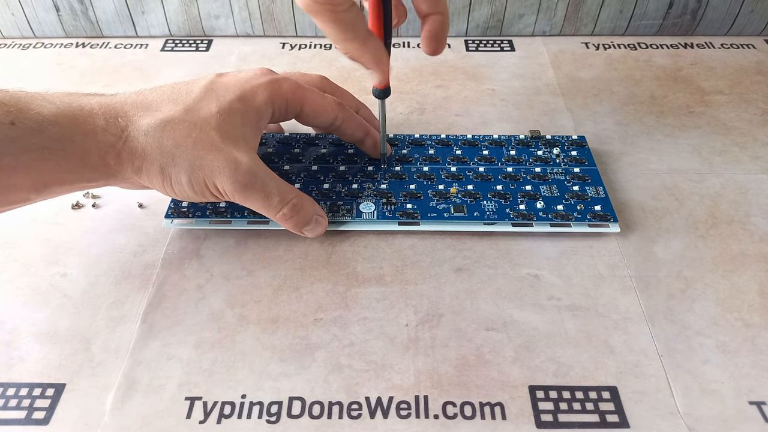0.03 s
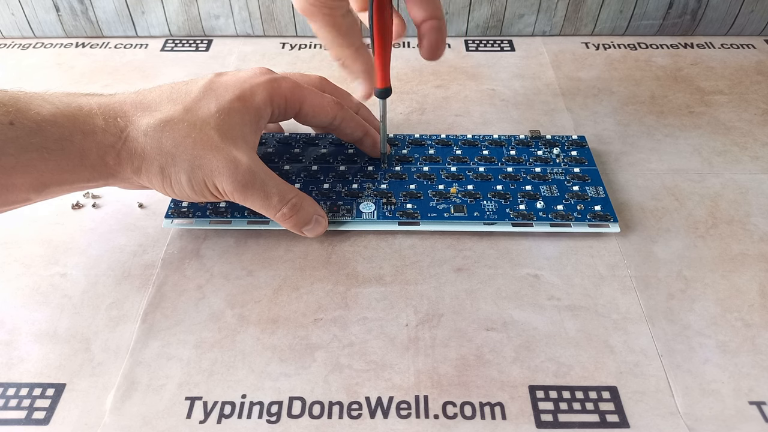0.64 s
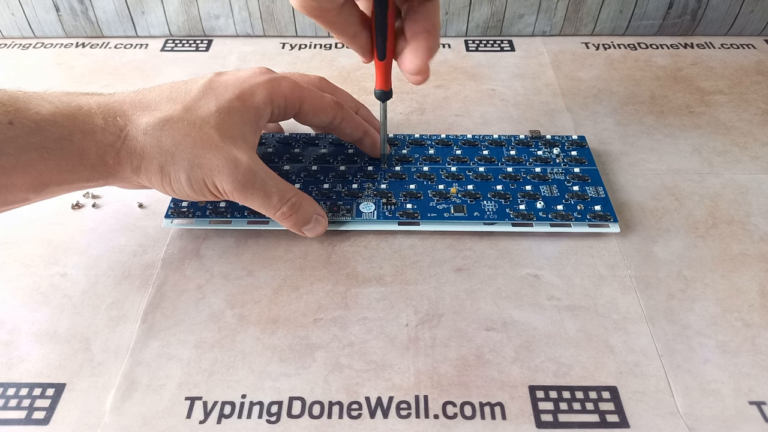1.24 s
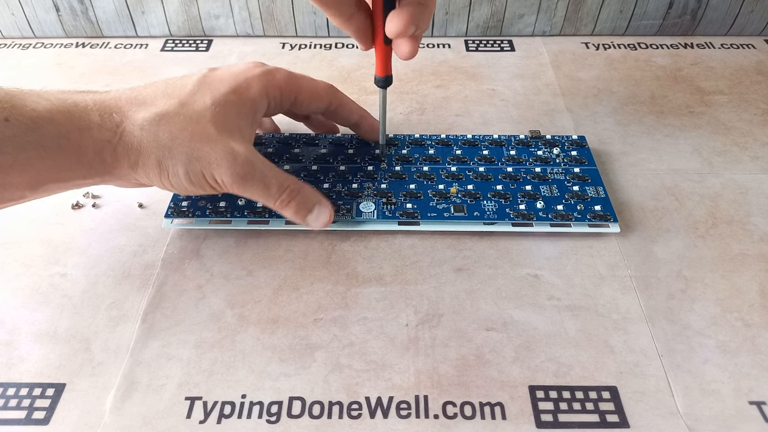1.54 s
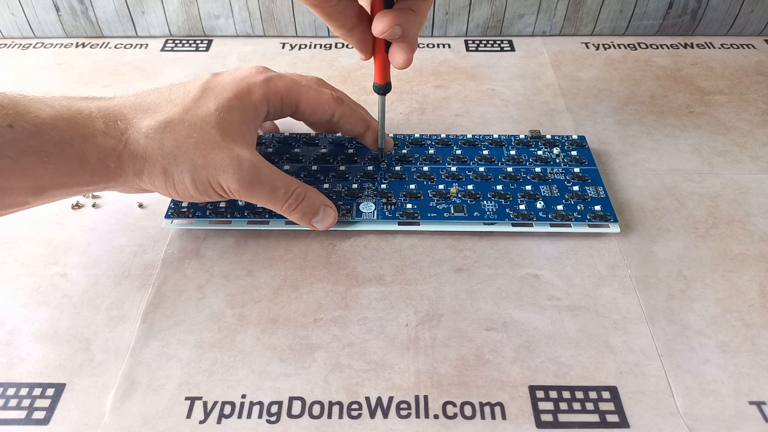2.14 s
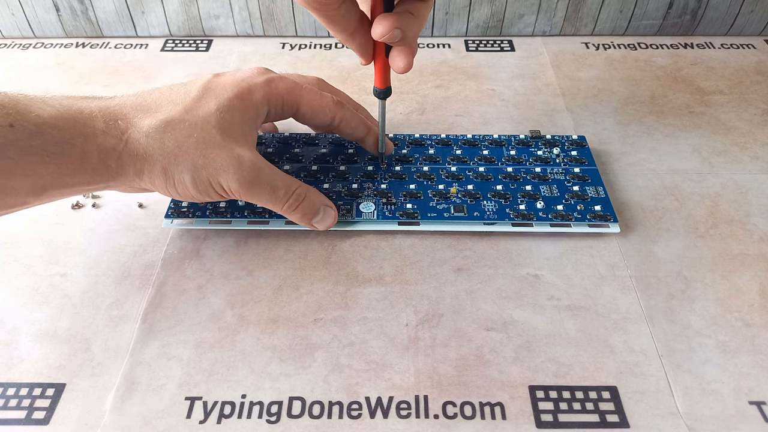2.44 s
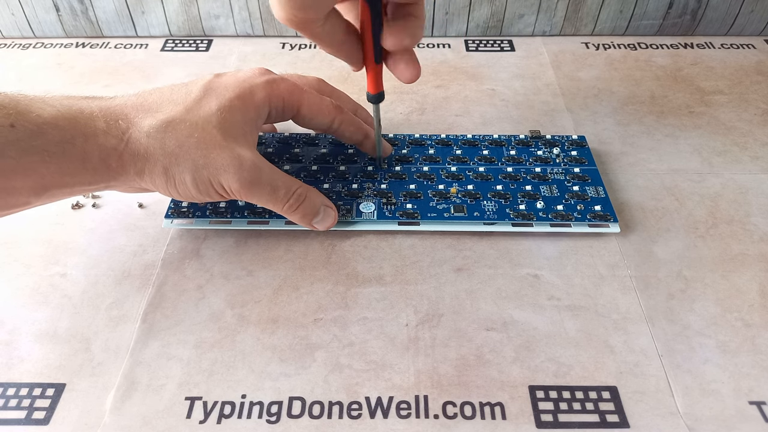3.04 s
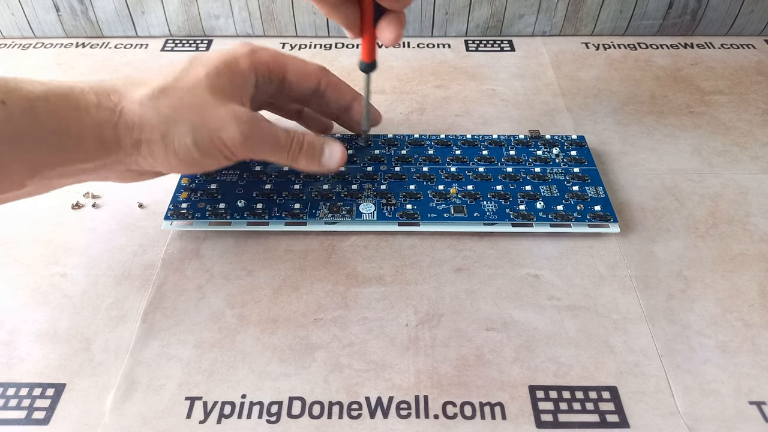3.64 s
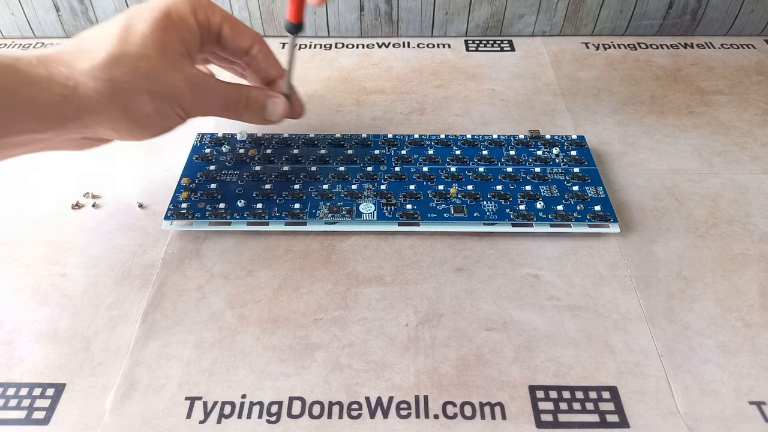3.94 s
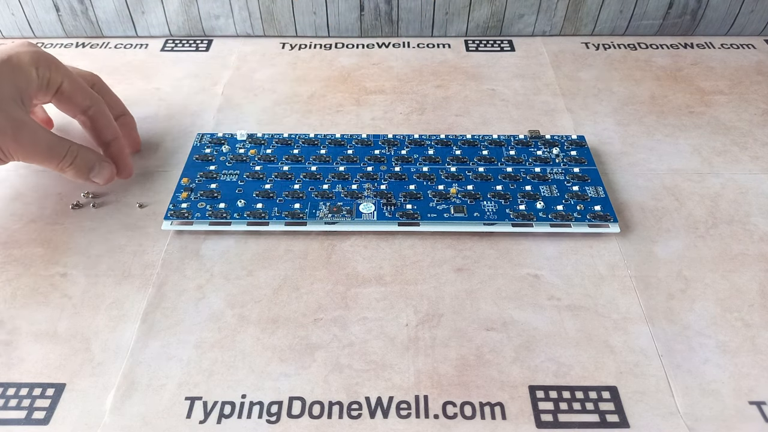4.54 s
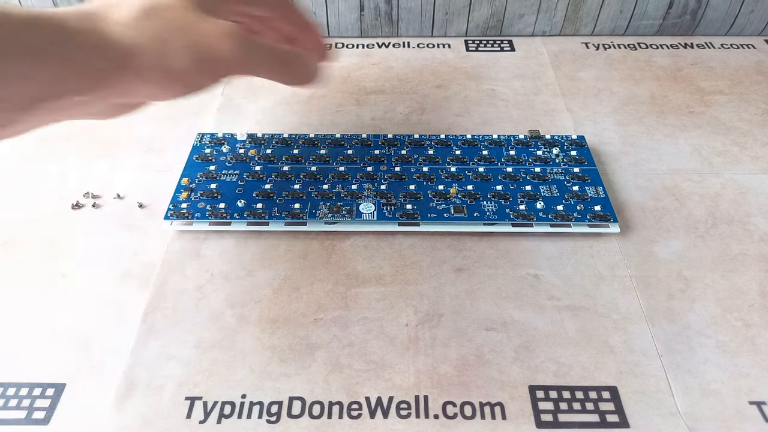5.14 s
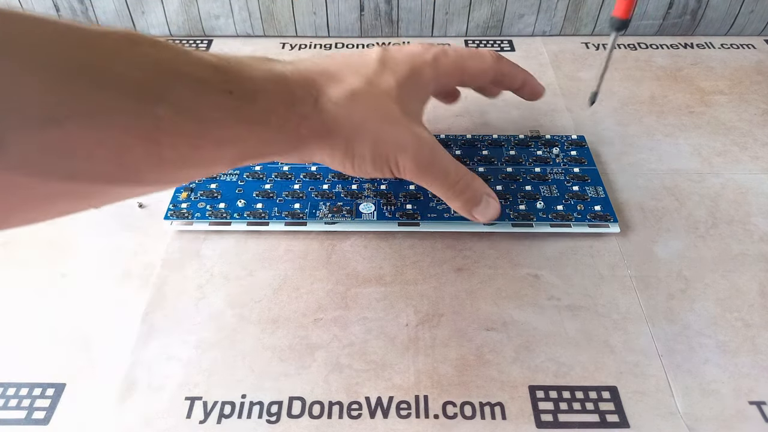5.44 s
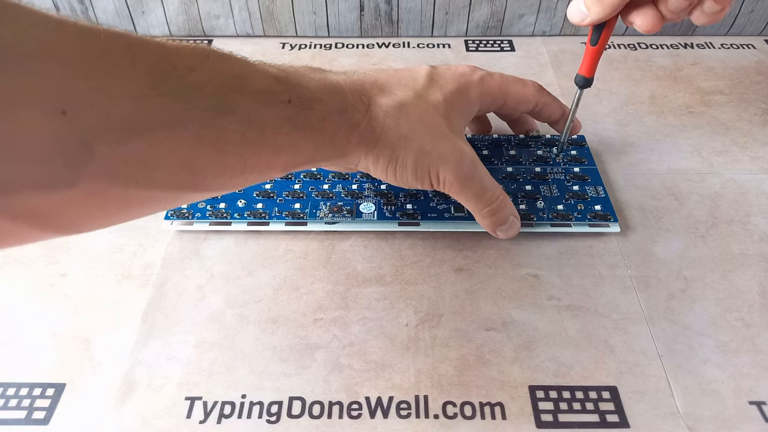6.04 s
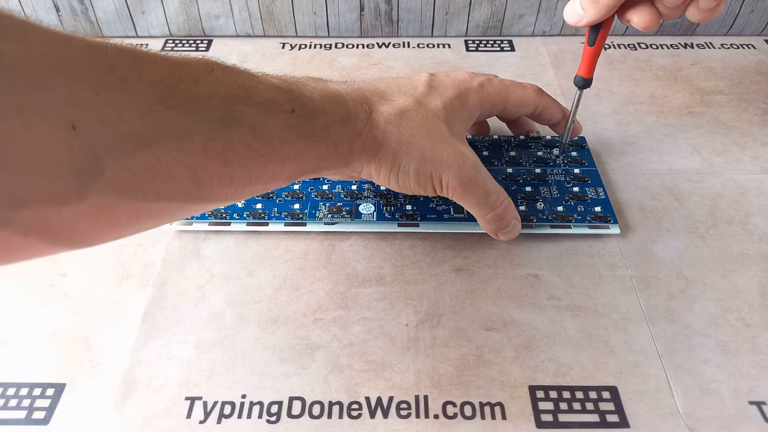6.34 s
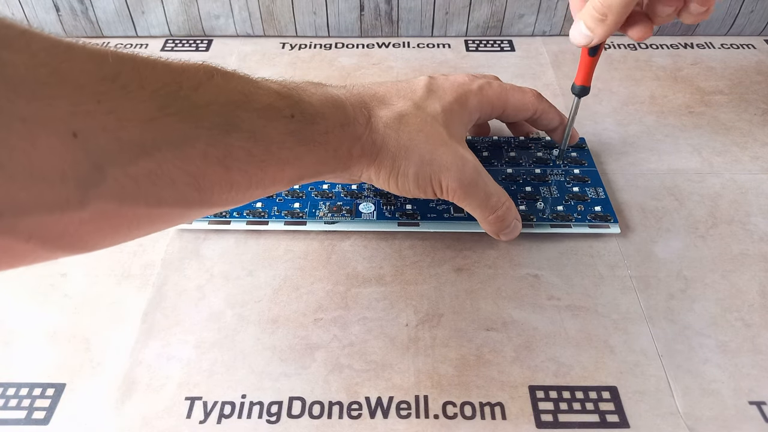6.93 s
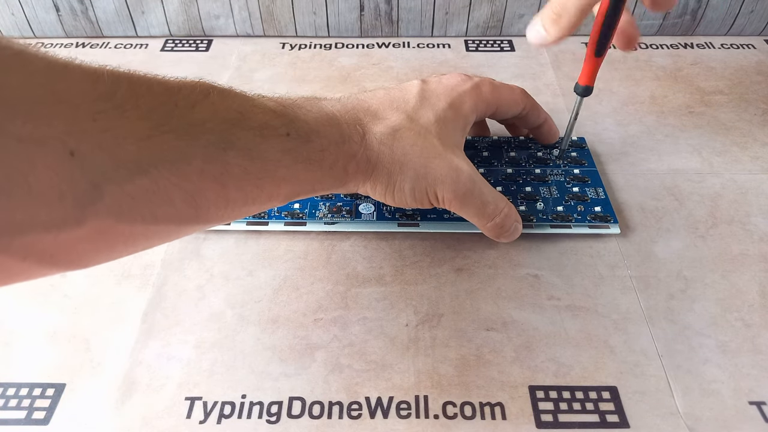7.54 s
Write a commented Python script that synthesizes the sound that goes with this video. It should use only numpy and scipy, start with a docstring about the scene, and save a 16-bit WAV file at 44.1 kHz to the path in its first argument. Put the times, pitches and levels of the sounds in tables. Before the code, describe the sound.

Steel grinds and snaps in a screw head, knocking a keyboard's board, with pauses and one tiny screw clattering onto a table.

```python
"""A steel tip grinds and snaps in a screw head: a hand screwdriver is backing small screws out of a
keyboard's circuit board. The tip catches, grinds round and slips, ringing the shaft and jolting the
board, first at its middle, later at a corner. In between, the freed screw drops and bounces on the table.
A stereo microphone hears it from close by in a small room, with faint squeaks of the thread, pings of
brushed parts, bumps and rubs of the hands, and a low room tone behind."""
import sys
import numpy as np
from scipy import signal
from scipy.fft import rfft, irfft, next_fast_len
from scipy.io import wavfile
from scipy.ndimage import uniform_filter1d, map_coordinates

SR = 44100
rng = np.random.default_rng(int(sys.argv[2]) if len(sys.argv) > 2 else 0)


def inscribe(sig):
    """Save sig as 16-bit PCM at rate SR to the path in sys.argv[1].

    A 1-D sig is mono; a 2-D sig holds one channel per row.
    Samples are clipped to [-1, 1] before scaling.
    """
    pcm = np.round(np.clip(np.atleast_2d(sig).T, -1, 1) * 32767)
    wavfile.write(sys.argv[1], SR, pcm.astype(np.int16))


N = 343980
SIZE = 2 ** 15  # samples in one event's buffer
T = np.arange(SIZE) / SR
HZ = np.fft.rfftfreq(SIZE, 1 / SR)
CORNER_S = 5.4  # the work moves to the corner of the board
NEUTRAL_DB, CATCH_SHARP_DB = -23, -6.5  # level of a middling contact; sharpness of every catch

# Under the hand's weight the tip slips, snaps against the screw and jolts the board:
# (time [s], tip level [dB], board level [dB], sharpness [dB]). All table levels are relative.
SLIPS = [(0.1288, -11.5, -32.5, -14), (.3655, -36, -38.5, -8), (0.423, -29.5, -33.5, -10.5),
         (.700, -17.5, -23.5, -2.5), (.717, -20, -21, -9.5), (1.052, -26, -38.5, -22.5),
         (1.1226, -17, -25.5, -31), (1.471, -40.5, -42.5, -12), (1.608, -38.5, -41, -8),
         (2.625, -32, -34, -11), (2.9373, -11, -13.5, -1), (3.182, -30.5, -35.5, 2),
         (3.232, -30, -48.5, 17.5), (3.742, -47, -49.5, -3), (6.721, -35, -31, -11),
         (6.981, -34, -28.5, -12.5), (7.408, -47, -31, -8.5), (7.588, -48.5, -47, -30)]
# The tip drops into the cross before the hand bears down: (time [s], tip level [dB], board level [dB])
CATCHES = [(.346, -52, -48.5), (.662, -33, -37), (1.008, -30, -32.5), (1.388, -53, -38),
           (2.599, -36.5, -48.5), (3.163, -33, -38)]
# The tip grinds round and drags the board along:
# (time of hardest pressure [s], rise time [s], tip level [dB], board level [dB], sharpness [dB])
GRINDS = [(.098, .006, -42, -71, -8.5), (.129, .010, -27.5, -52.5, -8), (.415, 0.011, -23, -39.5, -3.5),
          (.702, .014, -26.5, -30, -4.5), (1.050, 0.017, -35.5, -47.5, -12.5),
          (1.082, .010, -40.5, -32, -9), (1.121, .005, -40.5, -35, -17), (1.489, .006, -36.5, -43.5, 10.5),
          (2.87, .031, -53.5, -56.5, -18.5), (2.935, 0.0099, -28.5, -24, 1),
          (3.194, .009, -35, -45.5, 12.5), (3.238, .012, -44.5, -58, 15.5), (3.725, 0.02, -72, -56.5, -15),
          (6.706, 0.011, -50, -46.5, 9.5), (7.498, .012, -44.5, -42.5, -1),
          (7.590, .014, -58.5, -53.5, -11)]
# Spectrum of sliding skin: (frequency [Hz], level [dB])
SKIN = [(300, -16.5), (1000, -19), (2000, 3), (3800, 0.5), (6500, -1.5), (10000, -17)]


def snaps(level_db=-4, t60=0.009):
    """The tip hits the wall of the screw's cross: hard hits are abrupt, light ones skid for a moment."""
    # The loose tip ticks and leaves the board still: (time [s], level [dB], sharpness [dB])
    ticks = [(.057, -52, -6), (2.583, -35, 12), (3.2005, -25, 23), (3.615, -52, -1), (3.902, -55, 20.5),
             (7.121, -46, 2.5), (7.172, -54, -8.5)]
    blows = [(s, db, sharp_db) for s, db, _, sharp_db in SLIPS]
    blows += [(s, db, CATCH_SHARP_DB) for s, db, _ in CATCHES]
    out = np.zeros((2, N))
    for s, db, sharp_db in blows + list(ticks):
        contact_s = np.interp(db, [-30, -15], [.022, .004])
        grip = (1 - fade(contact_s)) ** 2
        life = t60 + contact_s / 3
        force = radiate([burst(life) * grip, burst(life) * grip], unlike=.55)
        snap = in_room(shaft(force, s, db, sharp_db), wet_db=0, near_db=-3)
        below_fizz = irfft(rfft(snap) * (HZ < SR / 6))
        add(out, s - contact_s / 20, amp(db + level_db) * snap / rms(below_fizz[:, :SR // 250]))
    return out


def scrapes(level_db=-1, slips_per_s=1500, scatter_db=5):
    """Steel grinds on steel in tiny uneven slips, which grow with the pressure and then let go."""
    out = np.zeros((2, N))
    for s, rise, db, _, sharp_db in GRINDS:
        lead, fall = min(s, 5 * rise), 0.98 * rise
        pressure = np.exp(np.minimum((T - lead) / rise, (lead - T) / fall))
        slipping = rng.random(SIZE) < slips_per_s / SR
        slips = slipping * amp(scatter_db * rng.uniform(-1.2, 1, SIZE)) * rng.choice([-1, 1], SIZE)
        force = pressure * (slips / rms(slips) + 0.37 * rng.standard_normal(SIZE))
        force *= rms(pressure) / rms(force)
        scrape = in_room(shaft(force, s, db, sharp_db), wet_db=2.5, near_db=-0.5)
        add(out, s - lead, amp(db + level_db) * scrape)
    return out


def shaft(force, s, db, sharp_db):
    """Contact rings the shaft: brighter when light or sharp, or with the tool tilted at the corner."""
    # Modes of the steel shaft: (frequency [Hz], width [Hz], level [dB])
    modes = [(2498, 83, -6), (3000, 350, -1), (3350, 550, 4.5), (3525, 25, 11.5), (4290, 990, 1.5),
             (4730, 900, -2), (6840, 420, -2.5)]
    bright_db = 0.16 * (NEUTRAL_DB - db) + 0.074 * sharp_db + 7.5 * (s > CORNER_S)
    edge = [(300, -4.5), (1200, 8), (2400, -bright_db / 3), (3500, 2), (4300, min(bright_db, 0)),
            (6500, bright_db), (7500, bright_db / 2), (10000, sharp_db - 1)]  # a sharp edge fizzes on top
    mode_power = sum(np.abs(resonances([mode])) ** 2 for mode in modes)
    body_db = 10 * np.log10(mode_power + amp(-15) ** 2)  # modes over a broad floor
    response = causal(along(edge, HZ) + body_db)
    return irfft(rfft(force) * response / rms(np.abs(response) * (HZ < SR / 6)))


def jolts(corner_life=0.66, rattle_db=4):
    """The board rocks on its case: slow low modes, a woody knock, a hard clack and rattling loose parts."""
    # Board modes: (frequency [Hz], t60 at the middle [s], level at the middle [dB], at the corner [dB])
    modes = [(126, 0.16, -16, -7), (165, 0.068, -3.5, -9.5), (197, 0.066, 0, -2), (258.6, 0.094, 2, 6.5),
             (280.4, 0.21, -1.5, -1.5), (314, 0.11, 1, -2.5), (415, 0.045, -5, -12.5),
             (470, 0.052, -10, -12.5), (522, 0.12, -1, -4.5), (601, 0.096, 0.5, -32),
             (656.4, .3, -5.5, -25), (693.3, 0.24, -6.5, -5), (741, .15, -3, -5), (804, 0.24, -10.5, -0.5),
             (844, 0.057, -8, -6), (1157, 0.062, -2.5, -2.5), (1330, 0.11, -13, 3.5),
             (1600, 0.24, -10.5, 2.5), (1919, 0.19, -10, -24), (2170, 0.07, -12, -27.5)]
    # Onset of the sub, thud, knock and clack registers: (rise time [s])
    rises = [.03, .012, 0.036, .008]
    hz, t60, middle_db, corner_db = np.transpose(modes)
    bands = ((4, 55, 130), (4, 130, 420), (3, 420, 1150), (2, 1150, 2600))
    registers = [signal.butter(order, (lo, hi), "bandpass", fs=SR, output="sos") for order, lo, hi in bands]
    out = np.zeros((2, N))
    for s, build_s, thud_db, knock_db, clack_db in board_blows():
        # the hands load the board anew at each jolt, shifting its modes; at the corner they damp it more
        pitch = hz * (1 + .02 * rng.standard_normal(len(hz)))
        mode_db, lives = (middle_db, t60) if s < CORNER_S else (corner_db, t60 * corner_life)
        rings = np.array([fade(life) * np.sin(2 * np.pi * f * T) for f, life in zip(pitch, lives)])
        strength = amp(mode_db + 2 * rng.standard_normal(len(hz))) * rng.choice([-1, 1], len(hz))
        rattle = 6 * amp(rattle_db) * radiate([burst(.05), burst(.05)], unlike=.5)
        board = in_room(strength @ rings + rattle, wet_db=1.5, near_db=-6) * (1 - fade(build_s)) ** 2
        levels_db = (thud_db - 15, thud_db + 0.5, knock_db - 2, clack_db - 2)
        for sos, rise, db in zip(registers, rises, levels_db):
            part = signal.sosfilt(sos, board * (1 - fade(rise)))
            add(out, s, amp(db) * part / rms(part[:, :SR // 16]), pan_db=-3)
    return out


def board_blows(lag_s=.0012, thud_limit_db=-22.5):
    """Slips, catches and grinds shake the board: weight gives thud, hard sharp contact gives clack."""
    def build_up_s(db):
        """Harder blows build up faster: the time halves for every 10 dB."""
        return .005 * 2 ** ((NEUTRAL_DB - db) / 10)

    # (time [s], build-up [s], level [dB], weight [dB], sharpness [dB])
    blows = [(s + lag_s, build_up_s(db), db, -5, sharp_db) for s, _, db, sharp_db in SLIPS]
    blows += [(s, build_up_s(db), db, -23, CATCH_SHARP_DB) for s, _, db in CATCHES]
    # in a grind the board starts to give before the hardest pressure
    blows += [(s - 1.4 * rise, 3 * rise, db, -6, sharp_db) for s, rise, _, db, sharp_db in GRINDS]
    for s, build_s, db, weight_db, sharp_db in blows:
        corner, hard_db = s > CORNER_S, db - NEUTRAL_DB
        thud_db = db + weight_db - 0.0984 * hard_db - 0.18 * sharp_db + 0.5 * corner
        clack_db = db - 6 + 0.08 * hard_db + .45 * min(sharp_db, 0) + 3.5 * corner
        yield s, build_s, min(thud_db, thud_limit_db), db, clack_db  # the case gives only so far


def dropped_screw(level_db=-6):
    """Each bounce is a sharp tick of the screw and a light knock of the table."""
    # The screw lands and bounces: (time [s], tick level [dB], knock level [dB])
    bounces = [(4.7133, -20.5, -51.5), (4.72, -39, -50), (4.7304, -27, -44.5), (4.778, -26, -46)]
    # Modes of the loose screw and of the table top: (frequency [Hz], width [Hz], level [dB])
    screw_modes = [(2900, 900, -13), (4850, 750, 0), (5400, 750, -1), (6500, 1200, -9), (12000, 8000, -23)]
    table_modes = [(260, 89, 6), (678, 67, 15), (1330, 230, -3)]
    tiny = causal(along([(1000, 12), (3400, -14), (4300, -4)], HZ))  # tone colour of the small screw
    knock = irfft(resonances(table_modes))
    out = np.zeros((2, N))
    for s, db, knock_db in bounces:
        impact = burst(.005) * (1 - fade(.002))
        tick = irfft(rfft(impact) * resonances(screw_modes) * tiny)
        blow = amp(db + level_db) * tick / rms(tick[:SR // 500])
        blow += amp(knock_db) * knock / rms(knock[:SR // 100])
        add(out, s, in_room(blow, wet_db=9.5, near_db=-2.5))
    return out


def squeaks(level_db=-15, db_per_rise_s=849.5, corner_db=3.5, scatter_db=3):
    """The thread sticks and slips and sings hoarsely: the slower a grind rises, the more it sings."""
    # Resonances of the thread: (frequency [Hz], width [Hz], level [dB])
    modes = [(2370, 360, -3), (3530, 490, -3.5)]
    response = sum(amp(db) * resonances([(hz, width, 0)]) ** 2 for hz, width, db in modes)
    out = np.zeros((2, N))
    for peak_s, rise, grind_db, _, _ in GRINDS:
        s, length = peak_s - 0.27 * rise, .65 * rise
        db = grind_db + level_db + db_per_rise_s * rise + corner_db * (peak_s > CORNER_S)
        lead = 4 * length
        stroke = np.exp(-.5 * ((T - lead) / length) ** 2)
        grip = uniform_filter1d(rng.standard_normal(SIZE), SR // 250)
        friction = rng.standard_normal(SIZE) * amp(scatter_db * grip / rms(grip))
        squeak = stroke * irfft(rfft(friction) * response)
        squeak *= rms(stroke) / rms(squeak)
        add(out, s - lead, amp(db) * in_room(squeak, wet_db=-4, near_db=-9.5))
    return out


def pings(level_db=-8, quality=9):
    """A light touch rings one short-lived mode of a small steel part."""
    # Parts are brushed: (time [s], level [dB], pitch [Hz])
    touches = [(0.637, -50, 2450), (3.902, -41, 6400), (4.244, -49, 2520), (4.244, -50, 3420),
               (5.152, -46.5, 2080), (5.255, -48, 2230)]
    out = np.zeros((2, N))
    for s, db, hz in touches:
        ring = irfft(rfft(burst(0.016)) * resonances([(hz, hz / quality, 0)]) ** 2)
        ring /= rms(ring[:SR // 200])
        add(out, s, amp(db + level_db) * in_room(ring, wet_db=2.5, near_db=-4.5))
    return out


def presses():
    """Soft flesh on the board gives short, dull bumps."""
    # The steadying hand presses or lets go: (time [s], level [dB], pitch [Hz])
    bumps = [(1.607, -41, 502), (1.805, -58, 220), (3.740, -43, 518.6), (6.075, -54, 129),
             (6.334, -50.5, 70), (7.300, -52.5, 302)]
    out = np.zeros((2, N))
    for s, db, hz in bumps:
        bump = np.sin(2 * np.pi * hz * T) * fade(.05) * (1 - fade(.06)) ** 2
        bump = in_room(bump, wet_db=-2, near_db=-6)
        add(out, s, amp(db) * bump / rms(bump[:, :SR // 32]))
    return out


def rubs(grain_db=4):
    """Dry skin slides over tool and table with a faint, grainy swish."""
    # The hand shifts its grip: (time [s], level [dB], half-width of the stroke [s])
    strokes = [(1.821, -72, .047), (4.986, -68.5, 0.04), (5.148, -61.5, .03), (5.544, -68.5, 0.022),
               (6.866, -65.5, 0.14), (7.337, -68, 0.011), (7.447, -54, 0.038)]
    lead = T[SIZE // 3]
    out = np.zeros((2, N))
    for s, db, width_s in strokes:
        grains = uniform_filter1d(rng.standard_normal(SIZE), SR // 400)
        friction = rng.standard_normal((2, SIZE)) * amp(grain_db * grains / rms(grains))
        swish = irfft(rfft(friction) * amp(along(SKIN, HZ)))
        stroke = np.exp(-.5 * ((T - lead) / width_s) ** 2)
        add(out, s - lead, amp(db) * stroke * radiate(swish / rms(swish), unlike=0.24))
    return out


def handling(level_db=-80, swing_db=5, shifts_per_s=12):
    """The hands are never quite still: a very faint swish of skin comes and goes."""
    motion = map_coordinates(rng.standard_normal(200), [np.arange(N) * shifts_per_s / SR], mode="wrap")
    hz = np.fft.rfftfreq(N, 1 / SR)
    swish = irfft(rfft(rng.standard_normal((2, N))) * amp(along(SKIN, hz)), N)
    return amp(level_db + swing_db * motion) * radiate(swish / rms(swish), unlike=0.96)


def room_tone(level_db=-60.5):
    """A steady low murmur of air with a faint hiss, all round the microphone."""
    # Spectrum of the quiet room: (frequency [Hz], level [dB])
    spectrum = [(15, -60), (30, -29), (45, -3.5), (130, -2), (290, -1), (450, -3), (750, -10), (1400, -15),
                (2000, -17.5), (5000, -25), (10000, -24), (15000, -25)]
    hz = np.fft.rfftfreq(N, 1 / SR)
    air = irfft(spread(rfft(rng.standard_normal((2, N))), hz) * amp(along(spectrum, hz)), N)
    return amp(level_db) * air / rms(air)


def in_room(x, wet_db, near_db, near_t60=0.016):
    """Direct sound reaches the microphone, then quick echoes off table and wall, and the room's tail."""
    # Decay of the small room: (frequency [Hz], t60 [s])
    decay = [(100, .3), (260, 0.22), (700, 0.34), (1840, 0.32), (4850, 0.29), (12800, 0.22)]
    # Colour of its tail: (frequency [Hz], level [dB])
    colour = [(200, -1), (700, -4.5), (2000, -6), (5000, -7), (7000, -5), (12000, -11.5)]
    hz, t, noise = signal.stft(rng.standard_normal((2, SIZE)), SR, nperseg=256)
    rate = np.log(1000) / along(decay, hz)[:, None]
    dying = noise * np.exp(-rate * t) * np.sqrt(2 * rate / SR)
    tail = signal.istft(dying, SR, nperseg=256)[1][:, :SIZE] * (1 - fade(0.028))
    near = np.array([burst(near_t60), burst(near_t60)]) * (1 - fade(0.0034))
    echoes = rfft(tail) * amp(wet_db + along(colour, HZ))
    echoes += amp(near_db) * rfft(near) / np.linalg.norm(near[0])
    return irfft(rfft(x) * (1 + spread(echoes, HZ)))


def spread(pair, hz):
    """Two unrelated spectra become left and right, more alike in the bass."""
    # Stereo width of the room: (frequency [Hz], side over mid [ratio])
    width = [(40, .66), (150, 0.73), (260, .3), (400, .6), (700, 0.93), (1500, .9)]
    side = along(width, hz)
    return np.array([pair[0] + side * pair[1], pair[0] - side * pair[1]]) / np.sqrt(1 + side ** 2)


def radiate(pair, unlike):
    """A small part sounds a little different to each side: two signals mix into left and right."""
    turn = np.arcsin(unlike)
    return np.cos(turn) * pair[0] + np.sin(turn) * np.array([pair[1], -pair[1]])


def amp(db):
    """Decibels to gain."""
    return 10 ** (np.asarray(db) / 20)


def rms(x):
    """Root mean square."""
    return np.sqrt(np.mean(x ** 2) + 1e-20)


def along(points, hz):
    """(frequency [Hz], value) points read on a log axis."""
    f, v = np.transpose(points)
    return np.interp(np.log(hz + 1), np.log(f + 1), v)


def causal(db):
    """The minimum-phase response with these levels on the HZ grid."""
    cepstrum = irfft(np.log(amp(db)))
    cepstrum[1:SIZE // 2] *= 2
    cepstrum[SIZE // 2 + 1:] = 0
    return np.exp(rfft(cepstrum))


def resonances(modes):
    """Response of (frequency [Hz], width [Hz], level [dB]) modes, alternating in sign."""
    return sum((-1) ** k * amp(db) * 1j * HZ * width / (hz * hz - HZ ** 2 + 1j * HZ * width)
               for k, (hz, width, db) in enumerate(modes))


def fade(t60):
    """A decay of 60 dB in t60 seconds."""
    return np.exp(-np.log(1000) * T / t60)


def burst(t60):
    """Noise that dies away."""
    return rng.standard_normal(SIZE) * fade(t60)


def add(out, s, x, pan_db=0):
    """Mix a stereo sound in at time s, closing its far end softly; negative pan is to the right."""
    start = max(round(s * SR), 0)
    part = (x * np.clip(4 - 5 * T / T[-1], 0, 1))[:, :N - start]
    out[:, start:start + part.shape[1]] += part * amp([[pan_db / 2], [-pan_db / 2]])


def scene():
    """The work at the table and the room around it, as they reach the microphone."""
    steel = snaps() + scrapes() + squeaks() + pings()
    return steel + jolts() + dropped_screw() + presses() + rubs() + handling() + room_tone()


def record(dry, top_hz=16100):
    """A two-port stereo microphone, dull above 7 kHz, with a peak near 15 kHz and a steep band limit."""
    # Microphone response: (frequency [Hz], level [dB])
    response = [(6000, -3.5), (6900, -9.5), (8000, -15), (10000, -14), (14200, -14), (14900, 1.5),
                (15700, 6), (16100, -16)]
    # Left port against right: (frequency [Hz], level difference [dB], phase lead [rad])
    ports = [(100, 3.5, 1), (240, 3, -0.5), (340, 0, -1.4), (520, 4, .5), (750, 1, .6), (1300, 3.5, 0),
             (3400, 0, 0.8), (6000, -1.5, 0.94), (12000, 0.5, -0.58)]
    impulse = irfft(causal(along(response, HZ)))[None, :SIZE // 16]
    coloured = signal.fftconvolve(dry, impulse, axes=1)
    size = next_fast_len(N + SIZE)
    hz = np.fft.rfftfreq(size, 1 / SR)
    balance_db = along(np.array(ports)[:, :2], hz)
    lead_rad = along(np.array(ports)[:, ::2], hz)
    left = amp(balance_db / 2) * np.exp(1j * lead_rad / 2)
    return irfft(rfft(coloured, size) * np.array([left, 1 / left]) * (hz < top_hz), size)[:, :N]


dry = scene()
out = record(dry)
inscribe(out)
```